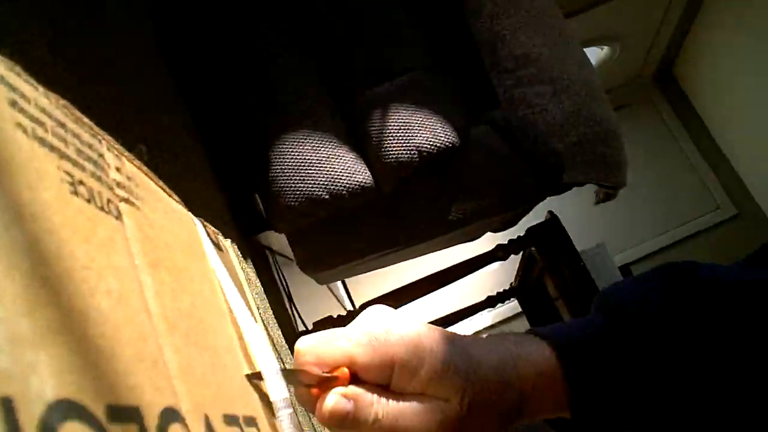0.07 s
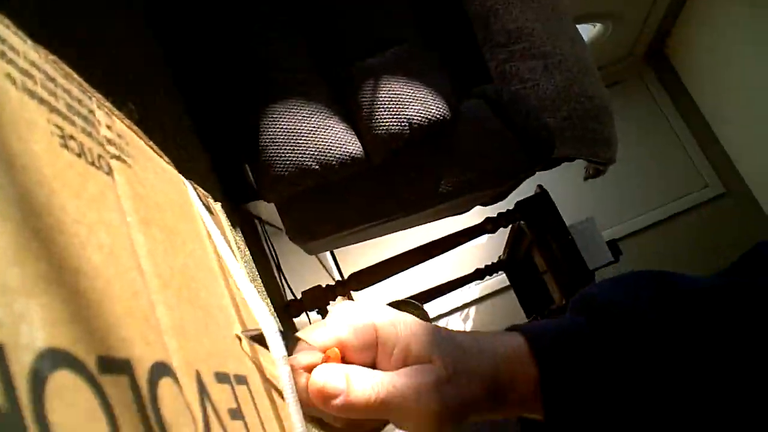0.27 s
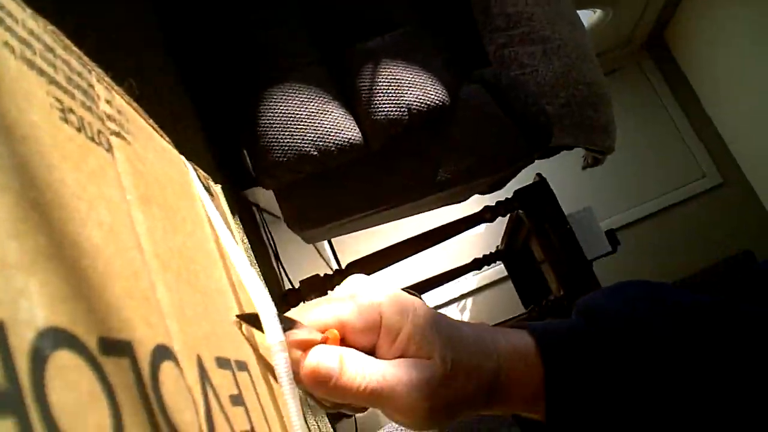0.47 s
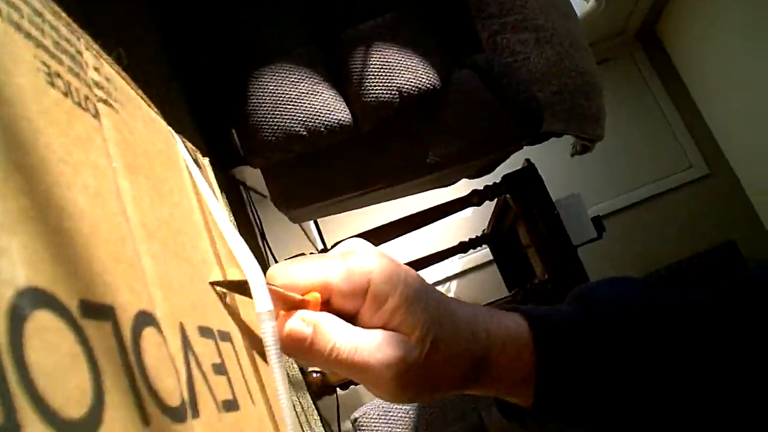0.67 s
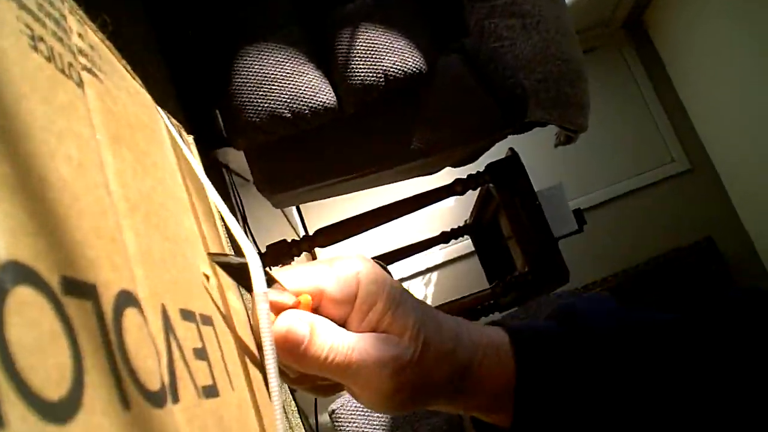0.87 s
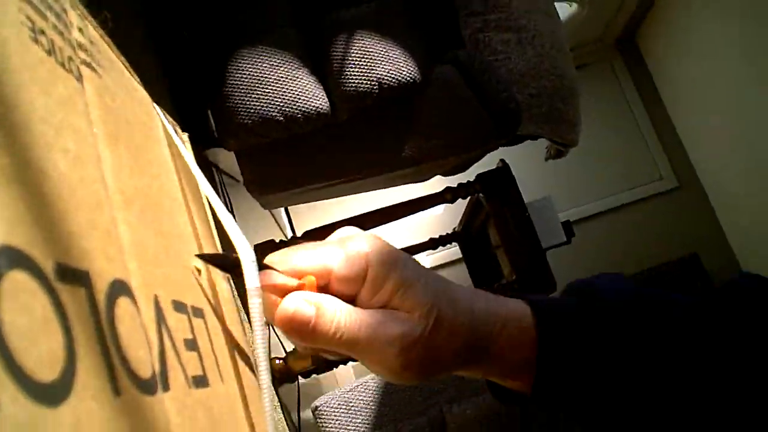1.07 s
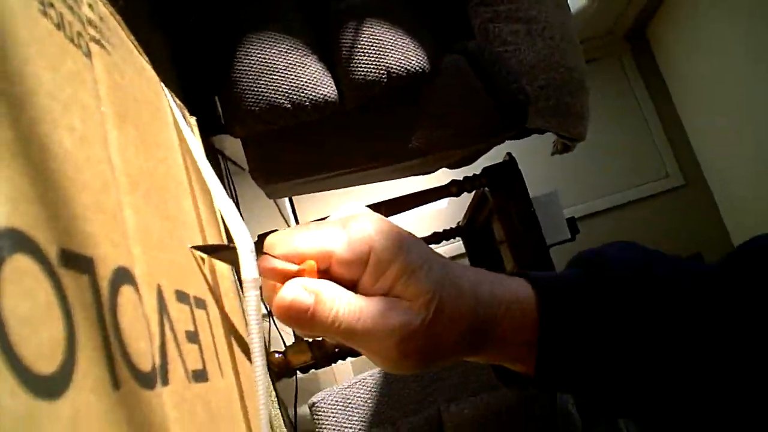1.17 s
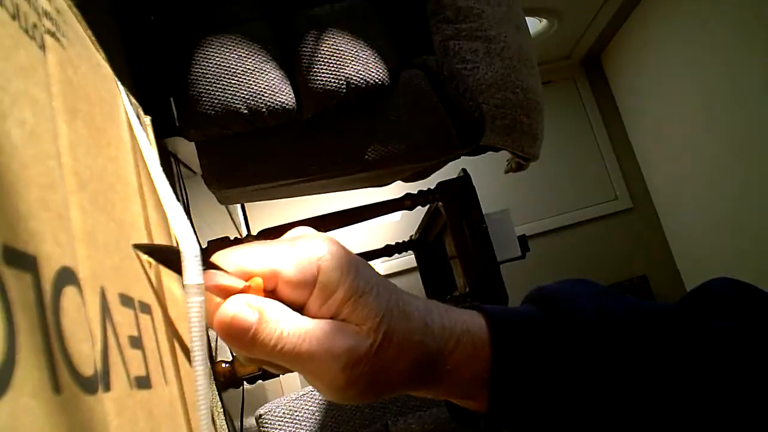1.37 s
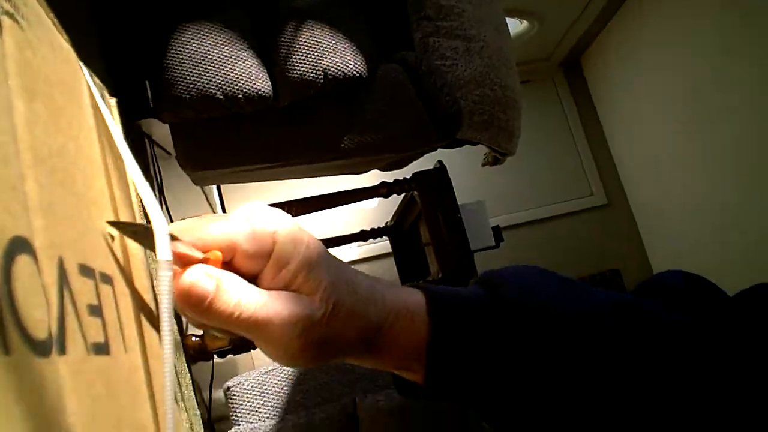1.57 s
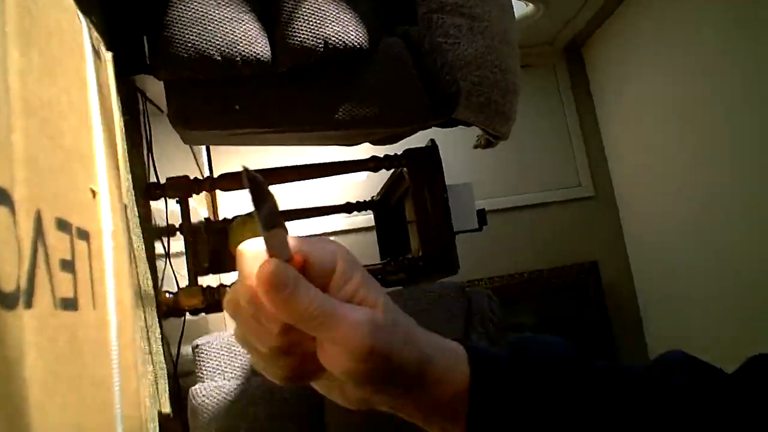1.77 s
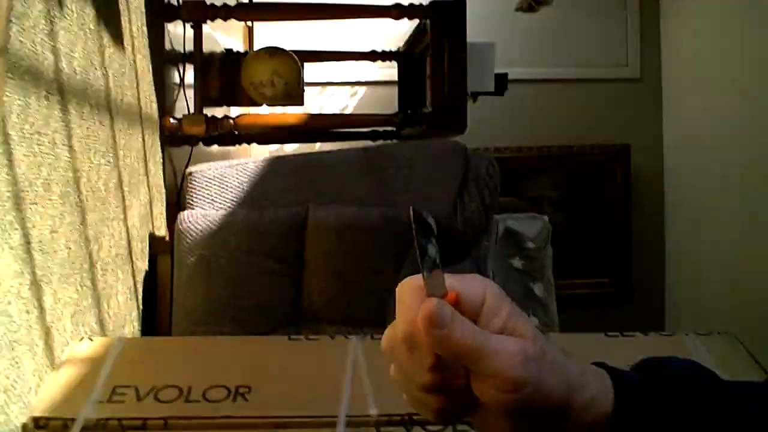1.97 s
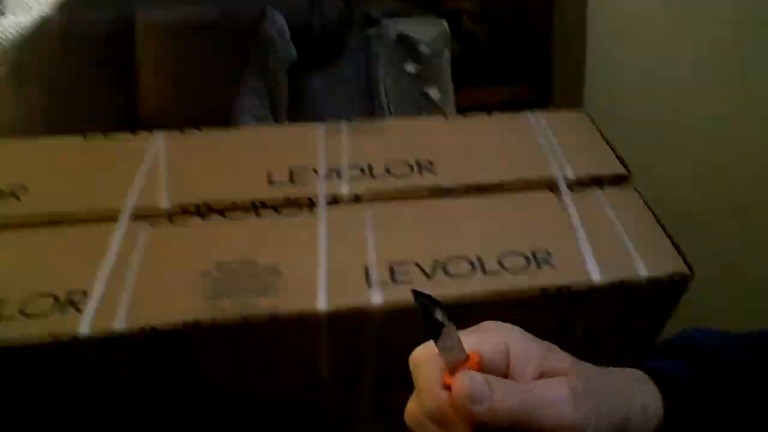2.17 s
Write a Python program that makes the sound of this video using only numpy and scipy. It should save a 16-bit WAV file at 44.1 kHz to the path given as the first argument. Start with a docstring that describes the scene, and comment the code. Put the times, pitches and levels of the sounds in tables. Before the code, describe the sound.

A knife cuts a taut plastic strap on a hollow cardboard box, close up in a quiet furnished room. Low plucky knocks at the start, a hard click-knock at 0.28 s, dull taps around 0.56-0.59 s, then faint ticks and scrapes. A bright blade slip clicks at 1.26 s. At 1.74 s the strap snaps with a loud crack, hollow thump and brief ring; small rustles follow.

```python
"""A furnished room, small microphone close by: a knife picks at a plastic strap on a cardboard box.
Knocks ring the hollow panel's modes; hand bumps and plucks of the taut strap are low damped tones.
The edge ticks and scrapes (shaped noise, random slips), strained strap squeaks, the slipping blade pings.
The strap snaps in a burst of noise cracks, its freed end rings, and decaying noise tails are the room's answer.
"""
import sys
import numpy as np
from scipy import signal
from scipy.fft import rfft, irfft, next_fast_len
from scipy.io import wavfile
from scipy.ndimage import uniform_filter1d

SR = 44100
rng = np.random.default_rng(int(sys.argv[2]) if len(sys.argv) > 2 else 0)


def transcribe(u):
    """Save the signal u as a 16-bit wav file named by the first command-line argument.

    u: samples, shape (n,) or (channels, n), limited to [-1, 1]; the rate is SR.
    q: integer samples, one column per channel.
    """
    v = np.clip(np.atleast_2d(u).T, -1, 1)
    q = np.round(v * 32767).astype(np.int16)
    wavfile.write(sys.argv[1], SR, q)


def to_linear_factor(level_db):
    """Convert decibel levels (scalar or array-like) to linear amplitude factors."""
    exponent = np.asarray(level_db, float) / 20
    return 10 ** exponent


N = 97152

# room hush spectrum: f/Hz, density/(dB per Hz)
HUSH_SPECTRUM = [(18, -70), (30, -34), (195, -39), (261, -40.5), (358, -9.5), (768, -4.5), (1170, -10),
                 (1450, -14.5), (5410, -24), (15100, -39.5), (16400, -45.5)]
HUSH_RMS_DB = -64
# room decay: f/Hz, t60/s
ROOM_DECAY = [(200, 0.18), (800, .35), (3000, 0.33), (8000, 0.23), (15000, 0.21)]
ROOM_DELAY_S, ROOM_RENEWAL_S = 0.0047, 0.12
BOX_WET_DB, EDGE_WET_DB, SNAP_WET_DB = -15, -19.5, -7.5

# soft low bumps, likely the hand leaning on the box: t/s, level/dB, f/Hz
BUMPS = [(0.074, -45, 185), (0.361, -39.5, 155), (0.467, -47, 149), (0.632, -45, 190), (0.759, -43.5, 177),
         (0.95, -49, 153), (1.15, -51.5, 200), (1.394, -37.5, 138), (1.686, -29, 172)]
BUMP_RISE_S, BUMP_T60_S = 0.004, 0.06

# plucks of the taut strap: t/s, level/dB
PLUCKS = [(.0033, -23), (.027, -25.5)]
# taut strap partials: f/Hz, level/dB, t60/s
STRAP_PARTIALS = [(548, -0.5, 0.1), (1175, -14, 0.035)]
SAG_RATIO, SAG_S = 0.083, 0.006  # extra pitch at the pluck, its time constant

# scraping strokes: start/s, length/s, rms/dB, box shake over that/dB, fade in and out/s
STROKES = [(0, 0.019, -41.5, 8, 0.052), (0.033, 0.1, -61.5, -3, 0.013), (0.074, 0.016, -58, -1, 0.014),
           (0.147, 0.068, -57.5, 1, 0.022), (0.232, 0.068, -54.5, 8.5, 0.068),
           (0.287, 0.027, -60, 22.5, 0.0056), (0.318, 0.045, -67.5, 15, 0.018),
           (0.367, 0.088, -62.5, -8, 0.013), (0.46, 0.069, -70.5, 6, 0.014),
           (0.534, 0.088, -61.5, 17, 0.011), (0.638, 0.079, -58.5, 12, 0.015),
           (0.798, 0.051, -70, 7, 0.007), (0.947, 0.027, -62, 1, 0.0095), (1.07, 0.092, -75.5, 18, 0.016),
           (1.251, 0.061, -49, 13, 0.006), (1.373, 0.022, -77.5, 24, 0.0066),
           (1.407, 0.074, -52, 2.5, 0.055), (1.673, 0.17, -59.5, 16, 0.0045),
           (1.816, 0.072, -50.5, 6, 0.03), (2.01, 0.11, -61, -1.5, 0.052),
           (2.145, 0.086, -64.5, 5.5, 0.045)]
# scrape spectrum: f/Hz, density/(dB per Hz)
SCRAPE_SPECTRUM = [(820, -2), (1400, -16), (1610, -3), (2480, -8.5), (3580, -11.5), (5900, -13.5),
                   (7000, -15.5), (8200, -23), (9800, -22), (13200, -33), (16000, -42)]
# shaken box spectrum: f/Hz, density/(dB per Hz)
SHAKE_SPECTRUM = [(47, -55), (80, -38.5), (343, -11), (457, -0.5), (618, -9), (1050, -6), (1390, -12.5),
                  (1650, -29), (3000, -50), (5500, -120)]
SLIPS_PER_S, SLIP_SPREAD_DB = 12000, 2  # mean rate, scale of the random slip level

# squeaks of the strained strap: start/s, length/s, level/dB, f/Hz, end pitch over start
SQUEAKS = [(1.643, 0.014, -58.5, 590, 0.92), (1.645, .008, -63.5, 6200, 0.83),
           (1.2, 0.012, -59, 2100, 0.84)]
SQUEAK_FLUTTER_DB = 6

# edge ticks on the strap: t/s, peak/dB, centre f/Hz, width/octaves
TICKS = [(0.0273, -53, 3100, 0.99), (0.1458, -46.5, 5030, 1), (0.208, -42, 5980, 0.65),
         (0.2338, -43, 2500, 0.68), (0.2752, -27, 5200, 1), (0.277, -27.5, 5200, 1),
         (0.2789, -22.5, 4150, 0.25), (0.2795, -18, 1830, 0.44), (0.371, -39, 3220.0, 0.78),
         (0.436, -47, 2770.0, 1), (0.4452, -44, 2600, 0.45), (0.564, -39.5, 2000, 0.37),
         (0.5862, -33.5, 2060, 0.54), (0.6375, -49.5, 2930.0, 0.52), (0.696, -48, 2500.0, 0.67),
         (0.7222, -47, 4870, 0.4), (0.8186, -45, 5800, 0.75), (0.567, -40, 1800, 0.27),
         (1.2556, -30.5, 3500, 0.67), (1.3116, -46.5, 2260, 0.52), (1.3643, -48, 4770.0, 0.88),
         (1.5388, -52, 2280, 0.5), (1.5727, -50.5, 2340, 0.33), (1.674, -50.5, 3320, 0.78),
         (1.7233, -39.5, 2340, 0.53), (1.8835, -31.5, 9900, 1), (2.1855, -45.0, 2500, 0.64)]
TICK_FALL_S, TICK_DULL_HZ = 0.018, 11900
# blade resonances colouring the ticks: f/Hz, half width/Hz, level added to a flat 1/dB
BLADE_RESONANCES = [(1800, 340, 10), (3530, 195, -6.5), (4760, 180, 0.5), (7030, 190, 0)]

# blade slips: t/s, peak/dB
BLADE_SLIPS = [(0.8905, -43.5), (1.2563, -14), (1.5386, -52), (1.7375, -18.5)]
# blade modes: f/Hz, level/dB, t60/s
BLADE_MODES = [(1716, 4.5, 0.0062), (3500, -4, 0.0081), (5500, -9, 0.0091), (6200, -11, 0.0084)]
# release of the strap end: t/s, peak/dB
STRAP_RELEASE = (1.736, -9)
# freed strap end modes: f/Hz, level/dB, t60/s
STRAP_END_MODES = [(2000, 6.5, 0.021), (3760, -0.5, 0.022), (5100, -11.5, 0.048), (5970, 2.5, 0.032),
                   (9000, -7.5, 0.026)]

# box panel modes: f/Hz, level/dB, t60/s
BOX_MODES = [(190, -1.5, 0.037), (269.3, -12.5, 0.063), (345, 3.5, 0.064), (490, -4, 0.049),
             (630, -3, 0.056), (770, 1, 0.038), (840, -17, 0.063), (1080, 6.5, 0.031), (1250, -4, 0.048),
             (1380, 8, 0.0097), (1795, 8.5, 0.034), (2070, -25, 0.0133)]
# knocks on the box: t/s, peak/dB, best excited f/Hz, reach/octaves, ring time over the free panel's
KNOCKS = [(0.0033, -17.5, 430, 0.11, 0.16), (0.027, -20.5, 440, 0.92, 0.52), (0.0817, -36, 496, 0.21, 0.35),
          (0.1514, -44.5, 694, 0.71, 0.61), (0.2323, -39, 790, 0.87, 0.49), (0.2789, -5.5, 750, 0.49, 0.4),
          (0.2806, -10.5, 680, 0.36, 0.28), (0.2825, -9, 345, 0.47, 0.36), (0.4354, -37.5, 810, 0.63, 1.1),
          (0.4463, -26, 700, 0.52, 0.86), (0.4495, -27, 900, 0.31, 1.12), (0.537, -42.5, 500, 0.58, 0.59),
          (0.5495, -36, 454, 0.14, 0.88), (0.562, -17.5, 453, 0.68, 0.53), (0.5848, -11, 460, 0.66, 0.33),
          (0.6755, -30.5, 400, 0.58, 0.62), (0.6926, -28.5, 388, 0.98, 0.55),
          (0.6969, -34.5, 326, 0.4, 0.51), (0.7228, -33.5, 490.0, 0.81, 0.53),
          (0.743, -43, 347, 0.27, 0.58), (0.757, -36.5, 356, 0.48, 0.4), (0.8892, -47.5, 680, 0.78, 0.61),
          (0.925, -36.5, 750, 0.46, 0.43), (0.9509, -46.5, 504, 0.76, 0.75),
          (1.025, -38, 660.0, 0.17, 0.54), (1.054, -46, 706, 0.56, 0.4), (1.0743, -39, 737, 0.32, 0.55),
          (1.1276, -32, 530, 0.57, 0.34), (1.1909, -52, 630.0, 0.51, 0.31), (1.229, -42.5, 490, 0.65, 0.56),
          (1.2394, -33.5, 770.0, 0.31, 1.3), (1.2568, -20, 740, 0.6, 0.3), (1.3106, -25.5, 660, 0.74, 0.39),
          (1.3651, -41, 695, 0.52, 0.47), (1.5108, -32, 352, 0.82, 0.31), (1.539, -43, 750, 0.44, 0.49),
          (1.5689, -55, 980, 0.73, 0.32), (1.6741, -23, 680, 0.15, 1.4), (1.6804, -29, 607, 0.39, 0.45),
          (1.7217, -27, 530, 0.8, 0.57), (1.7362, -8, 810, 0.89, 0.89), (1.738, -11.5, 345.0, 0.47, 1.04),
          (1.7395, -7, 770.0, 0.18, 1.6), (1.7424, -4.5, 1080, 0.28, 0.8), (1.79, -22.5, 770, 0.53, 0.49),
          (1.9863, -40.5, 865, 0.5, 0.4), (2.1865, -33.5, 1090.0, 0.25, 0.31)]
MODE_SCATTER_DB = 4
CONTACT_CYCLES, PUNCH_DELAY_CYCLES = 0.5, 0.73  # cycles of the best excited pitch
PUNCH_OVER_RING_DB = -6

# cracks of the tearing strap: t/s, onset rms/dB, t60/s
SNAP_CRACKS = [(1.7345, -10.5, 0.032), (1.7359, -10, 0.02), (1.7454, -15.5, 0.012), (1.752, -25, 0.044),
               (1.7572, -19.5, 0.024)]
# crack spectrum: f/Hz, density/(dB per Hz)
CRACK_SPECTRUM = [(760, -4.5), (1300, -5.5), (1610, -27), (2210, -8), (3830, -14), (4540, -15.5),
                  (4940, -9), (6110, -12.5), (8400, -13.5), (9600, -24), (14700, -35.5), (16400, -58.5)]


def unit(x):
    """Scales x to rms 1."""
    return x / np.sqrt(np.mean(x ** 2) + 1e-20)


def along(points, hz):
    """Interpolates (Hz, value) points on a log axis."""
    f, v = np.transpose(points)
    return np.interp(np.log(hz + 1), np.log(f + 1), v)


def coloured(x, spectrum):
    """Filters x by a spectrum of (Hz, dB) points, at rms 1."""
    m = next_fast_len(len(x) + 8192)
    gain = to_linear_factor(along(spectrum, np.fft.rfftfreq(m, 1 / SR)))
    return unit(irfft(rfft(x, m) * gain, m)[:len(x)])


def even(x):
    """Spectrum of a burst with its chance peaks levelled."""
    z = rfft(x)
    power = uniform_filter1d(np.abs(z) ** 2, size=max(3, len(x) // 400))
    return z / np.sqrt(np.abs(power) + 1e-20)


def patchy(x, depth_db):
    """Drifting bands of more and less gain, as the edge meets other ridges; rms 1."""
    z = signal.stft(x, nperseg=256)[2]
    field = uniform_filter1d(rng.standard_normal(z.shape), size=5, axis=0)
    field = uniform_filter1d(field, size=14, axis=1)
    return unit(signal.istft(z * to_linear_factor(depth_db * unit(field)), nperseg=256)[1][:N])


def add(track, s, sound):
    """Lays a sound on the track at s seconds."""
    part = track[round(s * SR):][:len(sound)]
    part += sound[:len(part)]


def hush():
    """Steady coloured noise of the quiet room."""
    return to_linear_factor(HUSH_RMS_DB) * coloured(rng.standard_normal(N), HUSH_SPECTRUM)


def room(x):
    """Noise tails, each frequency dying at its own speed; echoes are renewed as things move."""
    out, step = np.zeros(N), round(ROOM_RENEWAL_S * SR)
    for i in range(0, N, step):
        hz, t, z = signal.stft(rng.standard_normal(SR // 2), SR, nperseg=256)
        decay = to_linear_factor(-60 * t / along(ROOM_DECAY, hz)[:, None])
        tail = signal.istft(z * decay, SR, nperseg=256)[1]
        echo = signal.fftconvolve(x[i:i + step], tail / np.linalg.norm(tail))
        add(out, i / SR + ROOM_DELAY_S, echo)
    return out


def bumps():
    """A soft push makes one low damped swing."""
    out, t = np.zeros(N), np.arange(SR // 4) / SR
    rise = 1 - np.exp(-t / BUMP_RISE_S)
    for s, db, hz in BUMPS:
        add(out, s, to_linear_factor(db - 60 * t / BUMP_T60_S) * rise * np.sin(2 * np.pi * hz * t))
    return out


def twang():
    """The plucked strap sounds a short hollow note that sags as it settles."""
    out, t = np.zeros(N), np.arange(SR // 4) / SR
    bent_t = t + SAG_RATIO * SAG_S * (1 - np.exp(-t / SAG_S))
    note = sum(to_linear_factor(db - 60 * t / t60) * np.sin(2 * np.pi * hz * bent_t)
               for hz, db, t60 in STRAP_PARTIALS)
    for s, db in PLUCKS:
        add(out, s, to_linear_factor(db) * note)
    return out


def scrapes():
    """Dense random slips of the edge hiss on the strap and shake the box."""
    chance, sign, size = rng.random((3, 2, N))
    size_gain = to_linear_factor(-SLIP_SPREAD_DB * np.log(size + 1e-6))
    slips = (chance < SLIPS_PER_S / SR) * np.sign(sign - 0.5) * size_gain
    t = np.arange(N) / SR
    edge_gain, box_gain = np.zeros(N), np.zeros(N)
    for s, length, db, shake_db, fade in STROKES:
        gate = np.clip(np.minimum(t - s, s + length - t) / fade + 0.5, 0, 1)
        edge_gain += to_linear_factor(db) * gate
        box_gain += to_linear_factor(db + shake_db) * gate
    hiss = patchy(coloured(slips[0], SCRAPE_SPECTRUM), depth_db=1.5)
    shake = patchy(coloured(slips[1], SHAKE_SPECTRUM), depth_db=5.5)
    return edge_gain * hiss + box_gain * shake


def squeaks():
    """The strained strap gives brief unsteady whistles that glide a little."""
    out = np.zeros(N)
    drift = uniform_filter1d(rng.standard_normal((len(SQUEAKS), 4096)), size=100)
    flutter = to_linear_factor(SQUEAK_FLUTTER_DB * unit(drift))
    for (s, length, db, hz, glide), f in zip(SQUEAKS, flutter):
        u = np.clip(np.arange(4096) / SR / length, 0, 1)
        whistle = np.sin(2 * np.pi * np.cumsum(hz * glide ** u) / SR)
        add(out, s, to_linear_factor(db) * f * np.sin(np.pi * u) * whistle)
    return out


def ticks():
    """Short bright noise bursts, each around its own centre, coloured by the blade."""
    out, t = np.zeros(N), np.arange(1024) / SR
    hz = np.fft.rfftfreq(1024, 1 / SR) + 1
    blade = 1 + sum(to_linear_factor(db) / (1 + ((hz - mode_hz) / half_hz) ** 2)
                    for mode_hz, half_hz, db in BLADE_RESONANCES)
    dull = 1 + (hz / TICK_DULL_HZ) ** 4
    noise = rng.standard_normal((len(TICKS), 1024))
    for (s, db, centre_hz, width), c in zip(TICKS, noise):
        band = np.exp(-0.25 * (np.log2(hz / centre_hz) / width) ** 2)
        tick = irfft(even(c * to_linear_factor(-60 * t / TICK_FALL_S)) * band * blade / dull)
        tick = tick * to_linear_factor(-30 * t / TICK_FALL_S)  # second fall, after the filter
        add(out, s, to_linear_factor(db) * tick / np.abs(tick).max())
    return out


def pings():
    """Modes of the slipping blade and the loose strap end ring, a little differently each time."""
    out, t = np.zeros(N), np.arange(4096) / SR
    rise = 1 - np.exp(-t / 0.0002)
    events = [(row, BLADE_MODES) for row in BLADE_SLIPS] + [(STRAP_RELEASE, STRAP_END_MODES)]
    for (s, db), modes in events:
        hz, level, t60 = np.transpose(modes)[:, :, None]
        level_db, detune, phase = rng.standard_normal((3, len(modes), 1))
        swing = np.sin(2 * np.pi * hz * (1 + 0.01 * detune) * t + phase)
        ring = (to_linear_factor(level + level_db - 60 * t / t60) * swing).sum(0) * rise
        add(out, s, to_linear_factor(db) * ring / np.abs(ring).max())
    return out


def knocks():
    """Each knock is one short push, then rings the panel modes near its own pitch."""
    out, t = np.zeros(N), np.arange(SR // 4) / SR
    hz, level, t60 = np.transpose(BOX_MODES)[:, :, None]
    chance = rng.standard_normal((len(KNOCKS), len(BOX_MODES), 1))
    for (s, db, best_hz, reach, free), c in zip(KNOCKS, chance):
        near = np.exp(-0.5 * (np.log2(hz / best_hz) / reach) ** 2)
        decay = to_linear_factor(level + MODE_SCATTER_DB * c - 60 * t / (t60 * free))
        ring = (near * decay * np.sin(2 * np.pi * hz * t)).sum(0)
        ring = ring * (1 - np.exp(-t * best_hz / CONTACT_CYCLES))
        u = (np.pi * (t * best_hz - PUNCH_DELAY_CYCLES)) ** 2
        punch = to_linear_factor(PUNCH_OVER_RING_DB) * (2 * u - 1) * np.exp(-u)
        knock = punch + ring / np.abs(ring).max()
        add(out, s, -to_linear_factor(db) * knock / np.abs(knock).max())
    return out


def snap():
    """A few decaying noise cracks in quick succession as the strap tears and whips."""
    out, t = np.zeros(N), np.arange(4096) / SR
    colour = to_linear_factor(along(CRACK_SPECTRUM, np.fft.rfftfreq(4096, 1 / SR)))
    noise = rng.standard_normal((len(SNAP_CRACKS), 4096))
    for (s, db, t60), c in zip(SNAP_CRACKS, noise):
        fall = to_linear_factor(-60 * t / t60)
        crack = irfft(even(c * fall) * colour) * (t < 2 * t60)
        add(out, s, to_linear_factor(db) * crack / np.sqrt(np.sum(crack ** 2) / np.sum(fall ** 2)))
    return out


def scene():
    """All sources, the room's answer and its hush, in mono."""
    box = bumps() + twang() + knocks()
    edge = scrapes() + squeaks() + ticks() + pings()
    tear = snap()
    wet = room(to_linear_factor(BOX_WET_DB) * box + to_linear_factor(EDGE_WET_DB) * edge + to_linear_factor(SNAP_WET_DB) * tear)
    return (hush() + wet + box + edge + tear)[None]


def top_cut(x):
    """Nothing passes above the cut-off."""
    return signal.sosfilt(signal.butter(12, 16510, fs=SR, output="sos"), x)


def record(dry):
    """The small microphone rounds off the peaks, then drops the bass and the top."""
    peak, bass_cut_hz, stopband_hz = 0.97, 192.5, 16650
    rounded = peak * np.tanh(dry / peak)
    high_pass = signal.butter(4, bass_cut_hz, "high", fs=SR, output="sos")
    low_pass = signal.cheby2(10, 40, stopband_hz, fs=SR, output="sos")
    mix = signal.sosfilt(np.vstack([high_pass, low_pass]), rounded)
    return top_cut(mix)


dry = scene()
out = record(dry)
transcribe(out)
```